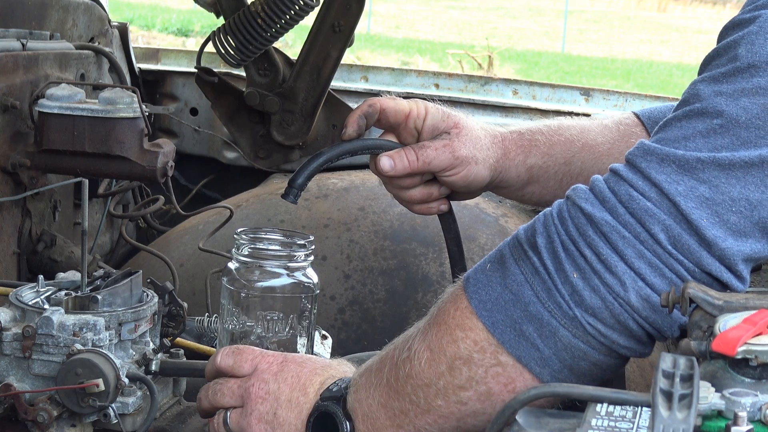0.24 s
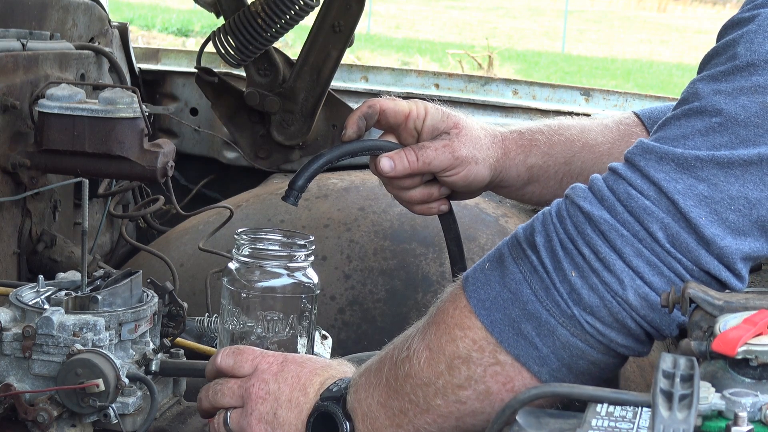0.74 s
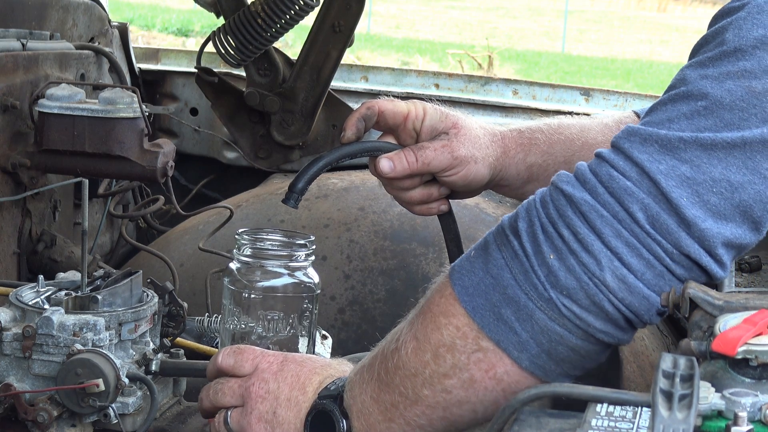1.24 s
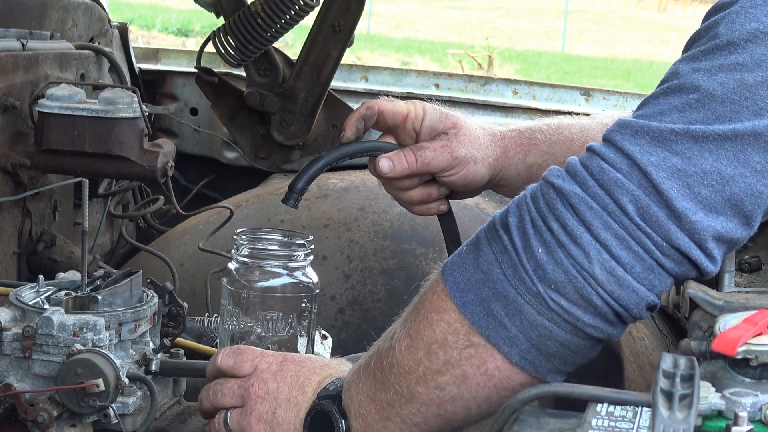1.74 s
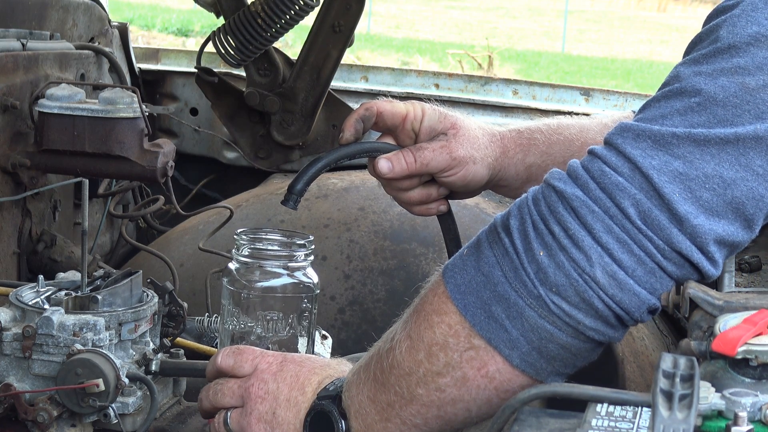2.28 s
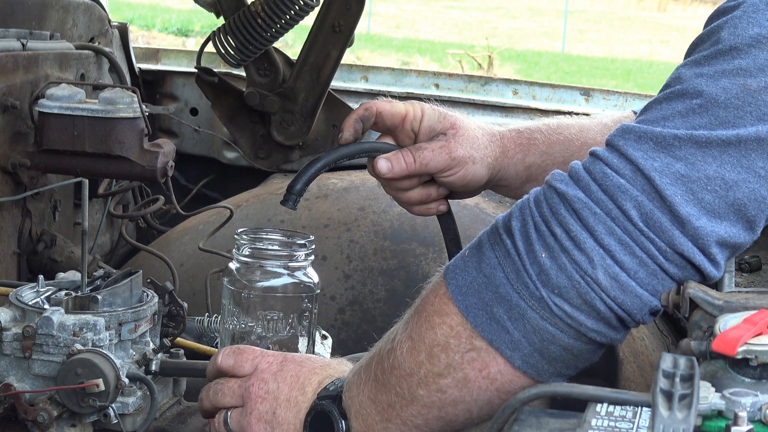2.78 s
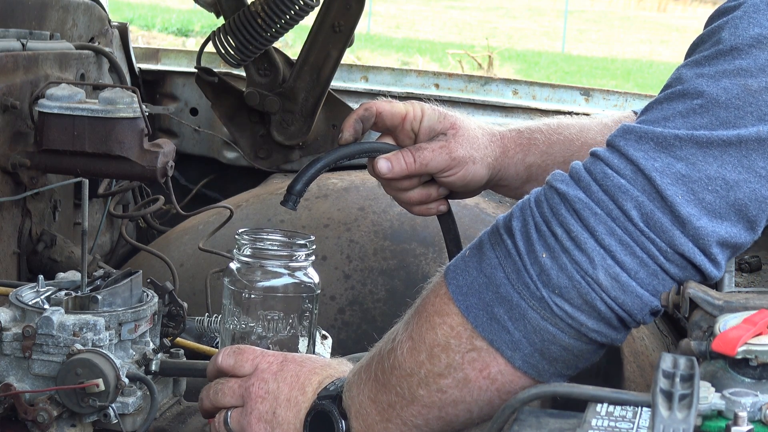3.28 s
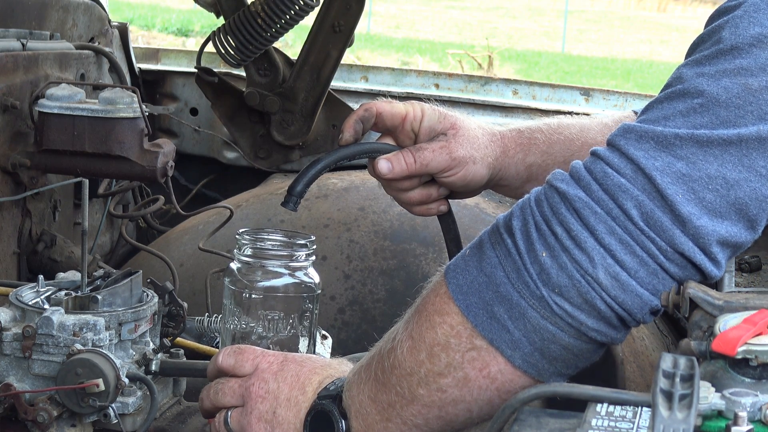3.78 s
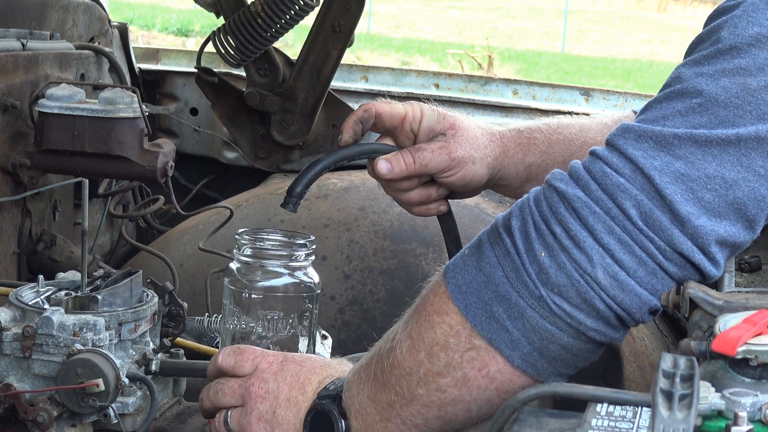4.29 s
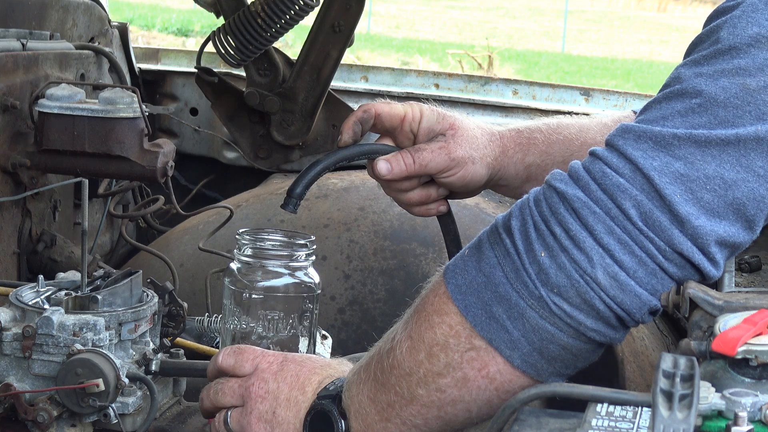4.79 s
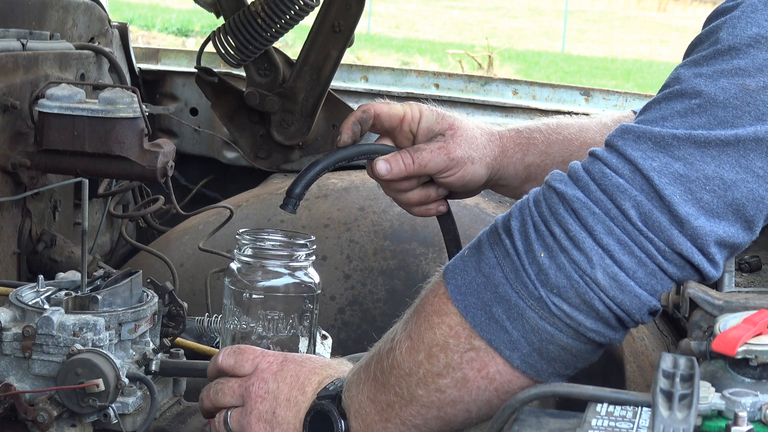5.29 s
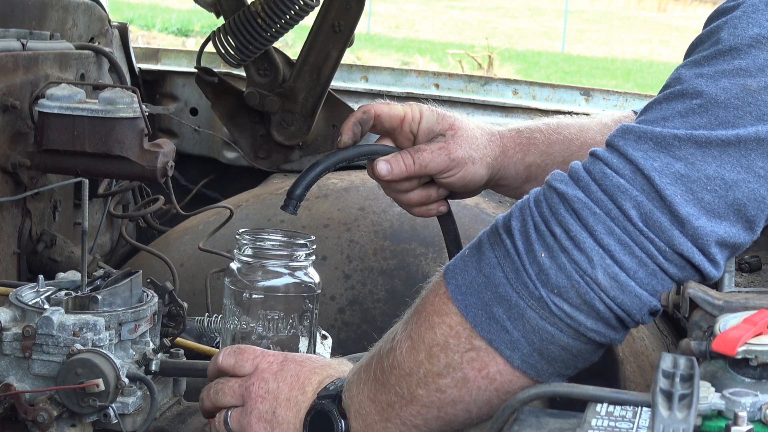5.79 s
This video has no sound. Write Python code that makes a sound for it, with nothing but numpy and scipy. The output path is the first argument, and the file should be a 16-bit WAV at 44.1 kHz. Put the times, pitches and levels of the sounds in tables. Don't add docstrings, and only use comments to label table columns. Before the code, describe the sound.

Outdoors, close to an open engine bay: faint air hiss and a brief sleeve rub, then a sharp solenoid clang. The starter gear grinds in, heaves through a few slow pushes, and settles into fast, even, whining churns, about eleven pulses a second, with low thuds on some strokes. The old truck engine never fires, and cranking continues to the end.

```python
import sys
import numpy as np
from scipy import signal
from scipy.fft import rfft, irfft, next_fast_len
from scipy.io import wavfile

SR = 44100
rng = np.random.default_rng(int(sys.argv[2]) if len(sys.argv) > 2 else 0)


def natural_amplitude(level_db):
    exponent = np.asarray(level_db, float) / 20
    return 10 ** exponent


def inscribe(sig):
    pcm = np.round(np.clip(np.atleast_2d(sig).T, -1, 1) * 32767)
    wavfile.write(sys.argv[1], SR, pcm.astype(np.int16))


N = 266187
T = np.arange(N) / SR

# time in seconds, mean tooth rate in Hz, hum level in dB.
SPEED = [(.5, 187.8, -49), (.55, 226.2, -33), (.63, 258, -26.5), (.69, 280.1, -34), (.735, 279.3, -26),
         (.77, 205.2, -30), (.81, 205.3, -28), (.865, 320.2, -27.5), (.97, 280.2, -31), (1.015, 378, -33),
         (1.09, 346, -34), (1.125, 420, -28), (1.16, 409, -31), (1.2, 370.5, -33), (1.225, 439.3, -51),
         (1.6, 460.9, -45), (2.3, 473.8, -51), (6.04, 478.8, -76)]
MESH_S, SEATED_S = .53, .98
CRANKING_S = 1.2


def rms_one(x):
    return x / np.sqrt(np.mean(x ** 2) + 1e-20)


def in_time(rows):
    s, *columns = np.transpose(rows)
    return [np.interp(T, s, c) for c in columns]


def butterworth(x, order, hz, kind="low"):
    return signal.sosfilt(signal.butter(order, hz, kind, fs=SR, output="sos"), x + 1e-18)


def colour(x, spectrum):
    size = next_fast_len(N)
    hz, db = np.transpose(spectrum)
    bin_hz = np.arange(size // 2 + 1) * SR / size
    gain = natural_amplitude(np.interp(np.log(bin_hz + 1), np.log(hz), db))
    return rms_one(irfft(rfft(x, size) * gain, size)[:N])


def resonate(x, hz, width_hz):
    r = np.exp(-np.pi * abs(width_hz) / SR)
    poles = [1, -2 * r * np.cos(2 * np.pi * hz / SR), r * r]
    return signal.lfilter([(1 - r * r) / 2, 0, (r * r - 1) / 2], poles, x + 1e-18)


def drift(rate_hz):
    r = np.exp(-2 * np.pi * rate_hz / SR)
    wander = signal.lfilter([1], [1, -2 * r, r * r], rng.standard_normal(N + SR))
    return rms_one(wander[SR:])


def open_air():
    # frequency in Hz, level in dB per Hz.
    air_colour = [(15, -54), (25, -26), (48, -20), (59, -18), (80, -11), (157, -11.5), (383, -24),
                  (426, -14), (488, -22), (1070, -26), (1480, -34.5), (15900, -46.5)]
    return natural_amplitude(-59 + 0.6 * drift(3.2)) * colour(rng.standard_normal(N), air_colour)


def sleeve():
    # time in seconds, peak level in dB.
    strokes = [
        (.02, -59),
        (.07, -48),
        (.34, -64),
    ]
    # frequency in Hz, level in dB per Hz.
    cloth_colour = [(35, -39), (60, -31), (194, -6), (248, -14), (735, -26), (917, -16), (1050, -25),
                    (2720, -24.5), (3710, -38), (12000, -59.5), (15600, -87), (22000, -120)]
    rise_db_per_s, fall_db_per_s = 650, 330
    rub = 0
    for s, db in strokes:
        rub = rub + natural_amplitude(db - np.maximum(rise_db_per_s * (s - T), fall_db_per_s * (T - s)))
    return rub * natural_amplitude(2.1 * drift(150)) * colour(rng.standard_normal(N), cloth_colour)


def far_vehicle():
    pass_s, pass_width_s, pass_db, drone_hz = 2.6, 1.1, -56.5, 52
    level_db = pass_db - 10 * np.log10(1 + ((T - pass_s) / pass_width_s) ** 2) + 1.2 * drift(1.7)
    tone = np.sin(2 * np.pi * drone_hz * T + 1.6 * drift(2.5))
    rumble = rms_one(resonate(resonate(rng.standard_normal(N), 55, 9), 52, 14))
    return natural_amplitude(level_db) * (tone + .4 * rumble)


def chassis():
    still_db, shake_db, jolt_db, jolt_s = -72, -59.5, 12, 0.067
    since = T - MESH_S
    moving_db = shake_db + jolt_db * np.exp(-np.abs(since) / jolt_s)
    level_db = np.where(since > 0, moving_db, still_db) + 2.1 * drift(2.5)
    return natural_amplitude(level_db) * rms_one(resonate(resonate(rng.standard_normal(N), 89, 80), 91, 90))


def solenoid():
    # start in seconds, peak level in dB, time to fade by 60 dB in seconds.
    hits = [
        (0.448, -42, 0.058),
        (0.457, -29.5, 0.5),
        (.47, -35, 0.12),
        (0.483, -22, 0.069),
        (0.489, -12.5, 0.065),
        (0.494, -24, 0.056),
        (0.508, -26, 0.37),
    ]
    # frequency in Hz, level in dB per Hz.
    clang_colour = [(59, -50), (100, -20), (224, -4.5), (734, -1), (889, -0.5), (1220, -3.5), (1640, -8),
                    (2030, -1.5), (6250, -11.5), (10400, -21), (15900, -37)]
    # casing pitch in Hz, width in Hz, level in dB.
    casing_modes = [(298, 43, -3), (472, 50, 2), (852, 19, -12), (1503, 35, 1), (1630, 32, 4),
                    (2340, 30, -10), (3320, 67, -14)]
    burst = 0
    for s, db, t60 in hits:
        attack = np.clip((T - s) / 0.0016, 0, 1)
        burst = burst + natural_amplitude(db - 60 * np.clip(T - s, 0, 2) / t60) * attack
    force = burst * colour(rng.standard_normal(N), clang_colour)
    dull = butterworth(force, 2, 5000)
    force = force + (dull - force) * np.clip((T - 0.501) / .012, 0, 1)
    ringing = sum(natural_amplitude(db) * resonate(force, hz, width_hz) for hz, width_hz, db in casing_modes)
    return butterworth(0.98 * force + 1.84 * ringing, 3, 130, "high")


def cranking():
    return np.clip((T - CRANKING_S) / .025, 0, 1)


def crank():
    # start in seconds,
    # gear load in dB in the slack, at the bite, halfway, late.
    run_up = [
        (.515, -39, -32, -21, -27),
        (.62, -17.5, -17, -14.5, -17.5),
        (.804, -21, -19, -14.5, -17.5),
        (.997, -20, -15, -20, -17.5),
        (1.104, -22.5, -15.5, -17, -16.5),
    ]
    # start in seconds, effort in dB, extra slack in dB.
    crank_turns = [(1.223, 3, -2.5), (1.587, 1.5, -0.5), (1.954, 1, 1.5), (2.302, 1, -0.7),
                   (2.659, 0.26, -1.5), (3.016, -0.2, -2), (3.379, -0.05, -1.5), (3.726, -1, -0.5),
                   (4.085, -1, -0.5), (4.432, -0.6, -0.3), (4.786, -0.96, -0.7), (5.132, -0.04, -1),
                   (5.486, 0.2, -1.5), (5.833, -0.1, -0.5), (6.187, .1, .1)]
    # start as a share of the turn,
    # load in dB in the slack, at the bite, halfway, late.
    firing_order = [(0, -33, -15.5, -15, -22), (.247, -29, -15.5, -16, -20), (.49, -29, -18.5, -21, -20.5),
                    (.733, -25.5, -19.5, -17.5, -20), (0, -28.5, -15.5, -16, -22),
                    (.255, -28.5, -16.5, -15.5, -21), (.488, -29, -18.5, -20, -20),
                    (.737, -24.5, -18.5, -19, -20.5)]
    bite_share, uneven_db = 0.097, 1
    bite_dulls_db_per_s = 0.3
    turn_s, effort_db, slack_db = np.transpose(crank_turns)
    rows = list(run_up)
    for k in range(len(crank_turns) - 1):
        turn_span = turn_s[k + 1] - turn_s[k]
        for share, slack, *load in firing_order[4 * (k % 2):][:4]:
            chance = effort_db[k] + uneven_db * rng.standard_normal(4)
            rows.append((turn_s[k] + share * turn_span, *(chance + [slack + slack_db[k], *load])))
    rows = np.array(rows)
    s = rows[:, 0]
    span = np.diff(s, append=turn_s[-1])
    stroke = np.interp(T, s[len(run_up):], np.arange(len(s) - len(run_up)))
    bite = s + bite_share * span
    knots = np.transpose([s, bite - .0035, bite - .0005, s + 0.35 * span, s + .5 * span, s + 0.75 * span])
    levels_db = rows[:, [1, 1, 2, 2, 3, 4]] - [4.4, 0.7, 2.86, 0.23, 0.19, 0.15]
    levels_db = levels_db - np.outer(s, [0, 0, bite_dulls_db_per_s, 0, 0, 0])
    load_db = np.interp(T, knots.ravel(), levels_db.ravel())
    return stroke, load_db - 40 * np.clip((MESH_S - T) / .04, 0, 1)


def teeth(stroke):
    compressions = [(.05, -.07), (.085, -.036), (.085, -.054), (.05, -.09)]
    teeth_hz = in_time(SPEED)[0]
    strokes = np.arange(int(stroke[-1]) + 2)
    fast, slow = np.transpose(compressions)[:, strokes % 4]
    knots = np.add.outer(strokes, [.07, .22, .66, .88]).ravel()
    share = np.transpose([fast, .7 * fast + .3 * slow, .1 * fast + .9 * slow, slow]).ravel()
    swing = cranking() * np.interp(stroke, knots, share)
    wobble = (.007 + .013 * (T < SEATED_S)) * drift(30)
    return np.cumsum(teeth_hz * (1 + swing + wobble) / SR)


def contact(count, uneven_db, grind):
    strength = natural_amplitude(uneven_db * np.clip(rng.standard_normal(N), -2, 2))
    knock = butterworth(np.diff(np.floor(count), prepend=0) * strength, 2, 6500)
    flanks = rng.standard_normal(N) * np.exp(-.8 * (count % 1))
    return rms_one(knock) + grind * rms_one(flanks)


def ring_gear(count, load_db):
    # pitch in Hz, width in Hz, level in dB.
    main_modes = [(1130, 70, -13), (1390, 40, -13), (1520, 45, -14), (1865, 40, -3), (1990, 40, -4),
                  (2161, 22, -7), (2312, 38, -1.5), (2350, 38, -.5), (2453, 35, -6), (2545, 40, -8),
                  (2830, 45, -8), (2928, 30, -9), (3106, 40, -3), (3255, 45, -6), (3425, 40, -9),
                  (3616, 38, -5), (3730, 60, -7), (4031, 60, -6), (4453, 45, -8), (4860, 40, -11),
                  (5150, 44, -12), (5420, 60, -10), (5628, 50, -7), (6060, 30, -14), (6375, 45, -9),
                  (6570, 70, -13), (7050, 50, -17)]
    # pitch in Hz, width in Hz, level in dB.
    high_modes = [(7640, 130, 1.5), (8050, 31, -6.5), (9700, 91, -0.5), (9470, 36, -5), (10670, 110, 2.5),
                  (11500, 150, 0.5)]
    forces = [contact(count, uneven_db=4, grind=1.1) * natural_amplitude(load_db) for _ in range(9)]
    modes = list(main_modes) + [(hz, width_hz, db - 22.5) for hz, width_hz, db in high_modes]
    out = 0
    for k, (hz, width_hz, db) in enumerate(modes):
        ringing = resonate(forces[k % 9], hz, width_hz) / np.sqrt(width_hz / 40)
        out = out + (-1) ** k * natural_amplitude(db) * ringing
    return natural_amplitude(11) * out


def block(count, load_db):
    # frequency in Hz, level in dB per Hz.
    block_colour = [(120, -41), (220, -16.5), (420, -16), (700, -14), (1100, -10), (1600, -11),
                    (2300, -9.5), (3500, -9.5), (6300, -11.5), (7600, -21), (11000, -28), (13500, -33.5),
                    (16000, -46)]
    body = colour(contact(count, uneven_db=4, grind=2.5), block_colour)
    treble = butterworth(body, 2, 7000, "high")
    slowness = np.clip(1.7 - np.gradient(count) * SR / 260, 0, .9)
    return natural_amplitude(load_db - 4.5) * (body - slowness * treble)


def housing(load_db):
    # pitch in Hz, width in Hz, level in dB.
    bell_modes = [(473, 17, 0), (950, 110, -16), (270, 260, -20)]
    run_up_db, settled_db, surge_db, settle_s = -36.5, -31, 4.5, 0.8
    steady_db = settled_db + surge_db * np.exp(-np.abs(T - CRANKING_S) / settle_s)
    level_db = run_up_db + cranking() * (steady_db - run_up_db)
    level_db = level_db - 55 * np.clip((MESH_S - T) / .04, 0, 1)
    shake = natural_amplitude(.5 * (load_db + 18) + 1.0 * drift(30))
    hum = 0
    for hz, width_hz, db in bell_modes:
        ringing = resonate(shake * rng.standard_normal(N), hz, width_hz)
        hum = hum + natural_amplitude(db) * rms_one(resonate(ringing, hz, 3 * width_hz))
    return natural_amplitude(level_db) * hum


def whine(count, load_db):
    # frequency in Hz, level in dB.
    whine_path = [(700, -30), (950, -17), (1130, -19.5), (1300, -22.5), (1500, -19), (1700, -13),
                  (1860, -26), (1925, -55), (2000, -11), (2150, -27), (2350, -5), (2700, -18.5),
                  (4000, -20.5), (5500, -41)]
    path_hz, path_db = np.transpose(whine_path)
    teeth_hz = np.gradient(count) * SR
    motor_db = in_time(SPEED)[1] + 0.32 * (load_db + 9.5)
    out = 0
    for k, db in [(1, 3), (2, -8), (3, -8)]:
        wave = np.sin(2 * np.pi * k * count + k * .8 * drift(35))
        out = out + natural_amplitude(motor_db + db + 2.0 * drift(40)) * wave
    loose_db = -6.5 * (T < SEATED_S)
    for k in range(2, 13):
        db = np.interp(k * teeth_hz, path_hz, path_db) + 2.5 + loose_db + np.minimum(9.4 * drift(24), 6)
        wave = np.sin(2 * np.pi * (k * count + rng.random()) + .6 * drift(25))
        out = out + natural_amplitude(load_db + db) * wave
    return out


def thuds():
    # time the slack closes in seconds, peak level in dB.
    slack_closes = [(1.245, -10.5), (1.702, -17), (1.974, -12.5), (2.769, -21.5), (3.036, -12.5),
                    (3.4, -16.5), (3.749, -31), (4.106, -16), (4.459, -24), (5.509, -36), (5.858, -32)]
    puff = rms_one(resonate(rng.standard_normal(N), 320, 440))
    out = np.zeros(N)
    for s, db in slack_closes:
        t = np.clip(T - s, 0, .1)
        knock = np.sin(2 * np.pi * (190 * t + 14000 * t ** 2))
        swell = (t / 0.0075 * np.exp(1 - t / 0.0058)) ** 2 * (t < .1)
        out += natural_amplitude(db - 1.5) * (knock + 0.65 * puff) * swell
    out += 1.1 * resonate(out, 429, 27)
    return butterworth(out, 2, 190, "high")


def engine_bay(x):
    out = x.copy()
    dull = signal.lfilter([.45], [1, -.55], x)
    for lag_s, db in [(.0031, -19), (.0057, -18), (.0093, -19), (.0141, -20), (.022, -22)]:
        lag = int(lag_s * SR)
        out[lag:] += natural_amplitude(db) * dull[:-lag]
    return out


def scene():
    outdoors = open_air() + sleeve() + far_vehicle() + chassis()
    stroke, load_db = crank()
    count = teeth(stroke)
    gears = ring_gear(count, load_db) + block(count, load_db) + housing(load_db) + whine(count, load_db)
    engine = butterworth(gears + thuds() + solenoid(), 4, 120, "high")
    return (engine_bay(engine) + outdoors)[None]


def top_cut(x):
    return signal.sosfilt(signal.butter(12, 16050, fs=SR, output="sos"), x)


def record(dry):
    rounded = .95 * np.tanh(dry / .95)
    mix = signal.sosfilt(signal.cheby2(24, 60, 16100, fs=SR, output="sos"), rounded)
    return top_cut(mix)


dry = scene()
out = record(dry)
inscribe(out)
```